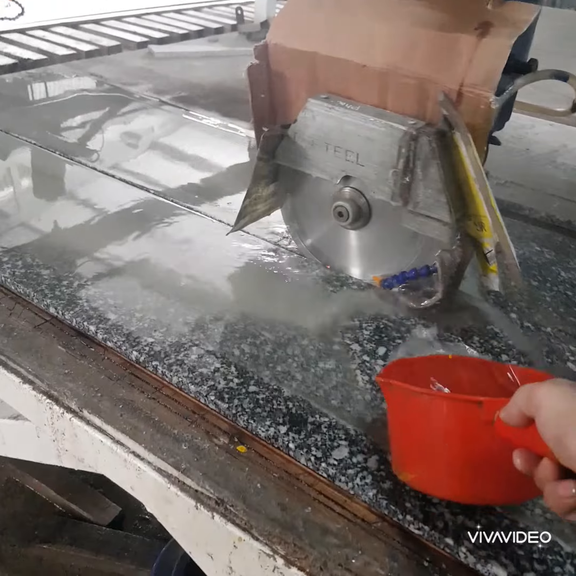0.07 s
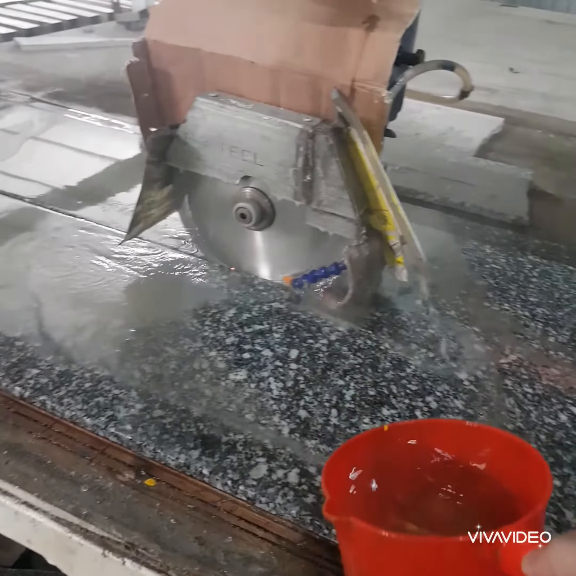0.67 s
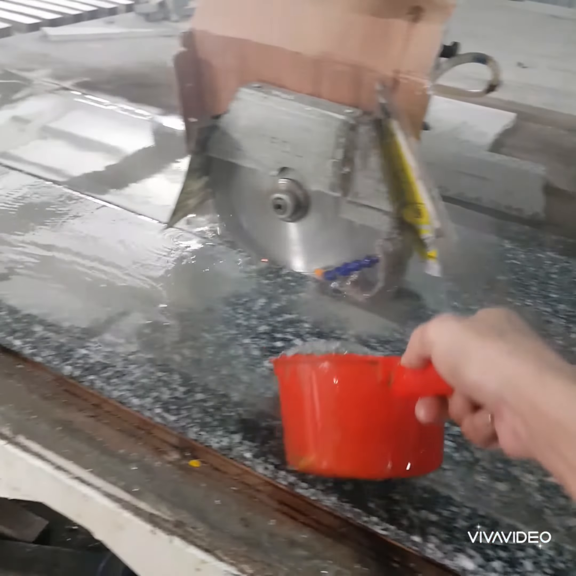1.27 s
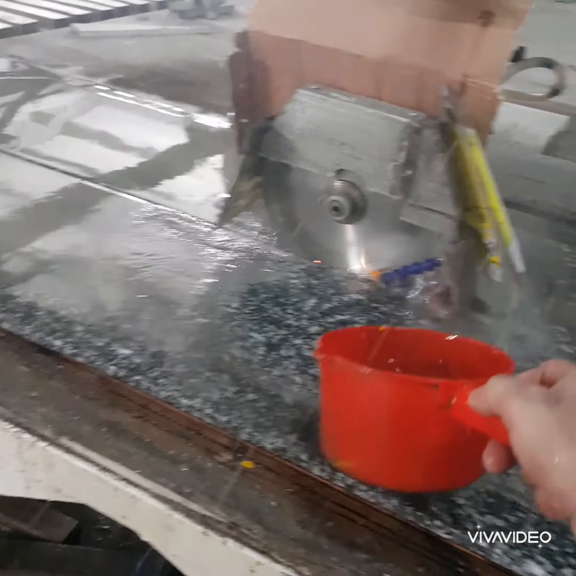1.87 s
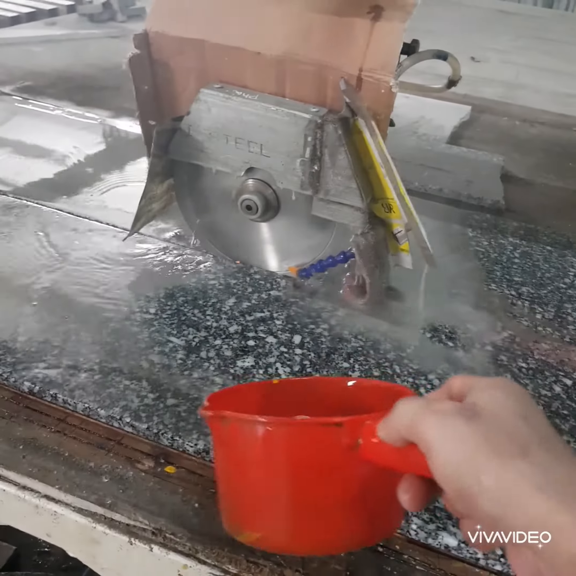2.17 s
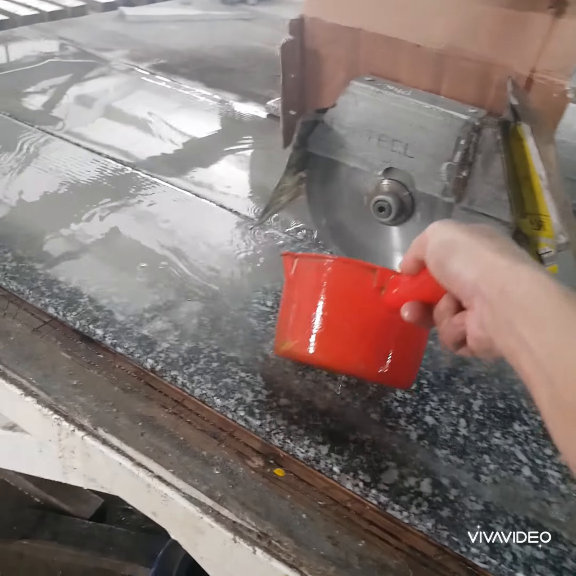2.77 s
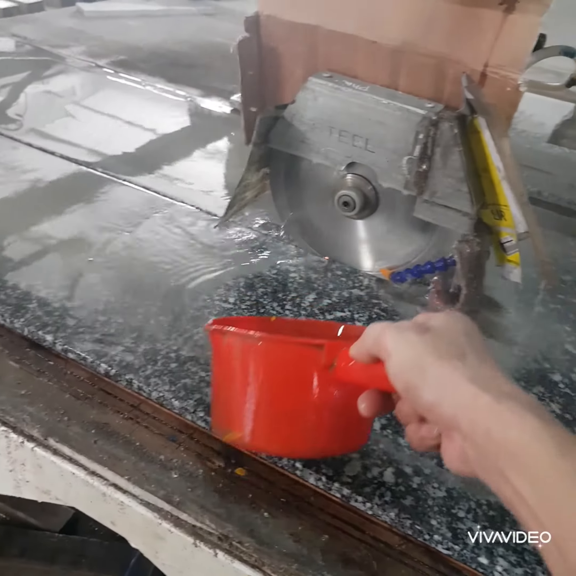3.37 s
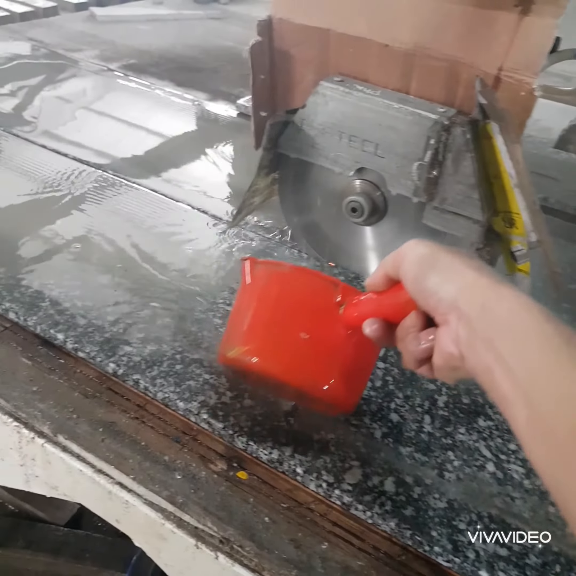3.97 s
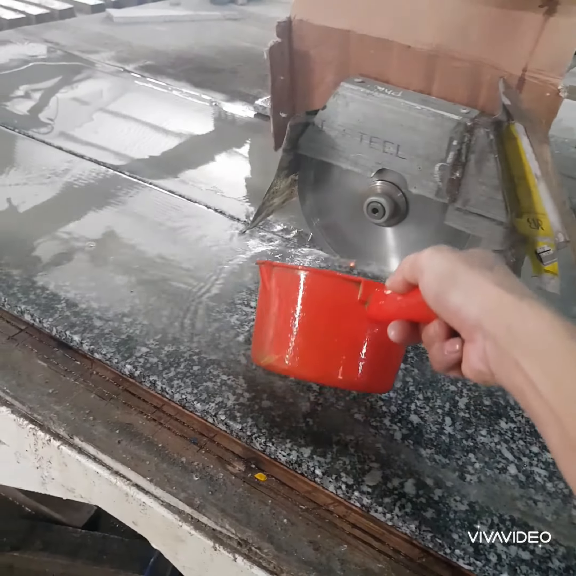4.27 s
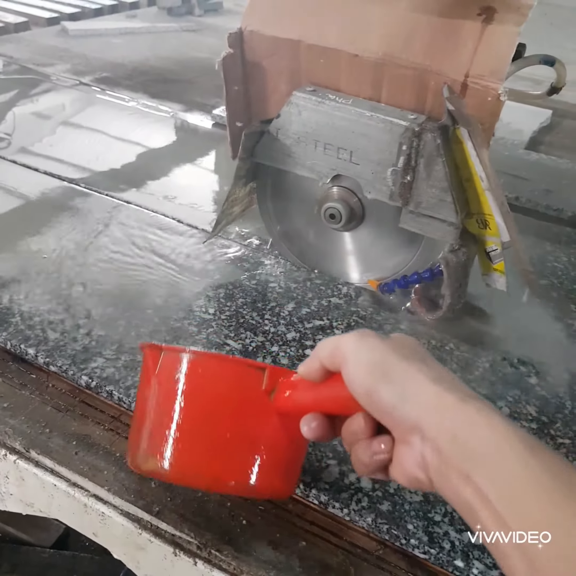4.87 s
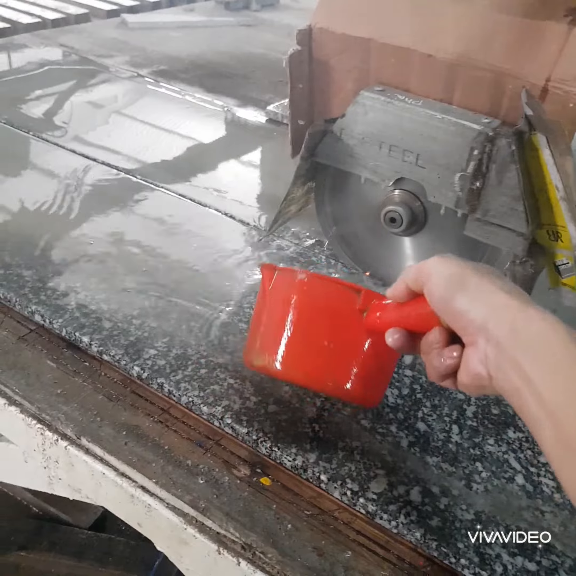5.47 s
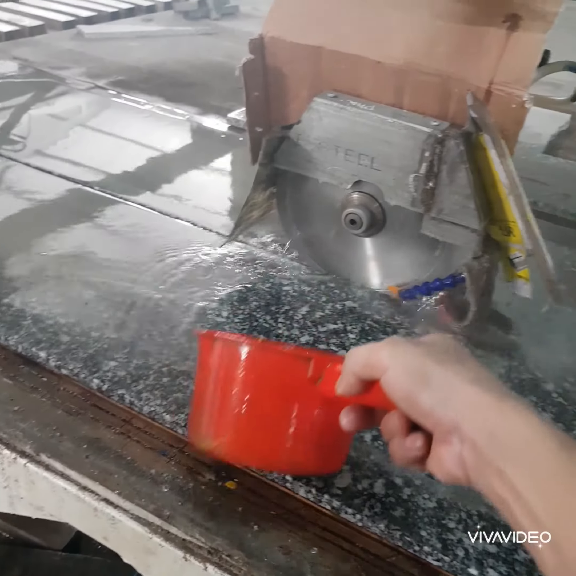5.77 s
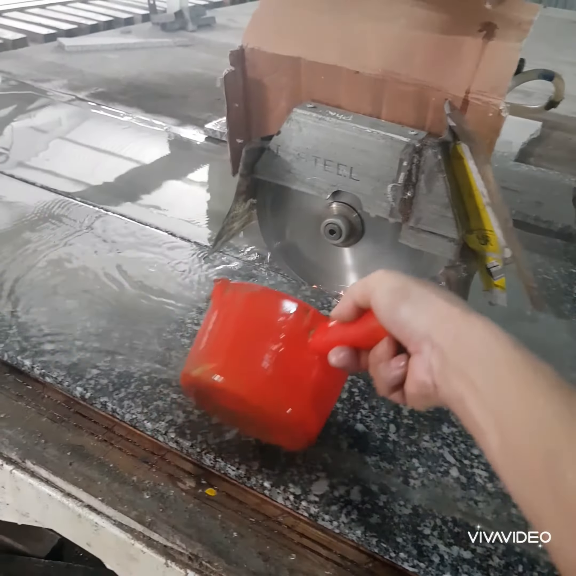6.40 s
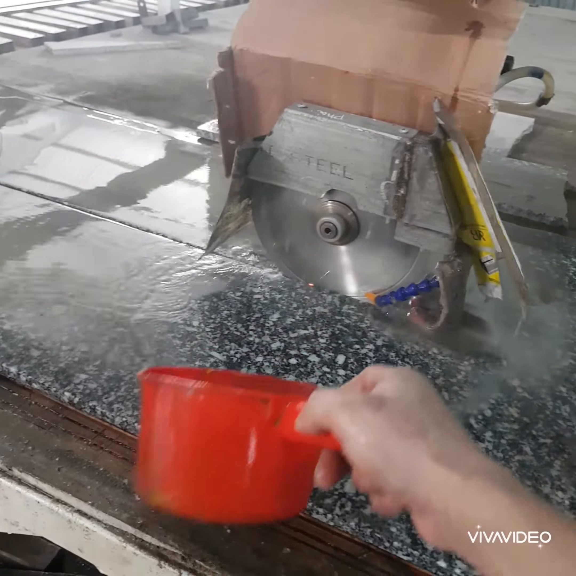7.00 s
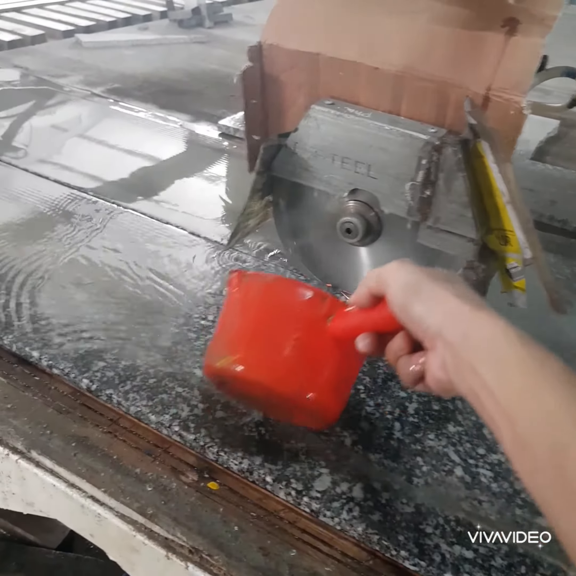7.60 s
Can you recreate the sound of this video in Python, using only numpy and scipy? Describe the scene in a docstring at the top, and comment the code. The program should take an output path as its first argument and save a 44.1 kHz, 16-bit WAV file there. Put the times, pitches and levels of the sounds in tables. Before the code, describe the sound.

Close by in a workshop, a stone saw cuts continuously, droning and whining under a bright hiss of grinding and spray.

```python
"""In a workshop, a bridge saw cuts a wet stone slab close by. Its shaft turns 26-31 times a second and
slows as the cut bites. The blade's 18 uneven segments (its teeth) drum through the frame and howl in
the guard. Diamond grit grinds the stone and sets the steel disc ringing, while cooling water is flung
off as a fizzing spray. Now and then the hiss dips briefly and comes back."""
import sys
import numpy as np
from scipy import signal
from scipy.fft import rfft, irfft, next_fast_len
from scipy.io import wavfile
from scipy.ndimage import uniform_filter1d, map_coordinates

SR = 44100
rng = np.random.default_rng(int(sys.argv[2]) if len(sys.argv) > 2 else 0)


def digitize_waveform(pressure):
    """Quantize a signal to 16-bit integers and store it at the path in sys.argv[1].

    Rows of a 2-D input are taken as channels; values are limited to [-1, 1].
    """
    field = np.atleast_2d(pressure).T
    bounded = np.clip(field, -1, 1)
    quanta = np.round(bounded * 32767).astype(np.int16)
    wavfile.write(sys.argv[1], SR, quanta)


N = 336924
TIME = np.arange(N) / SR

# The shaft slows where the cut bites deeper. Each row: time in seconds, turns per second.
SHAFT_SPEED = [(0.0, 29.08), (0.14, 28.59), (0.44, 25.95), (0.63, 26.07), (0.91, 27.72), (1.16, 28.23),
               (1.49, 29.73), (1.92, 28.89), (2.25, 29.03), (2.74, 27.11), (3.07, 27.99), (3.76, 26.59),
               (4.38, 28.04), (4.69, 29.65), (5.4, 29.99), (6.08, 30.77), (6.41, 29.8), (6.8, 27.95),
               (7.4, 27.85), (7.64, 27.64)]


def amp(db):
    """Turn decibels into a gain."""
    return 10 ** (np.asarray(db) / 20)


def unit(x):
    """Scale x to an average (rms) level of 1."""
    return x / np.sqrt(np.mean(x ** 2) + 1e-20)


def along(points, hz):
    """Read between rows of frequency and value, on a scale of octaves."""
    freqs, values = np.transpose(points)
    return np.interp(np.log(hz + 1), np.log(freqs + 1), values)


def bump(hz, centre, width, db):
    """The lift in dB from one resonance, a pitch at which a part likes to ring."""
    return db / (1 + (2 * (hz - centre) / width) ** 2)


def bumps(hz, modes):
    """The lift in dB from several resonances together."""
    return sum(bump(hz, *mode) for mode in modes)


def bell(middle, length):
    """A smooth swell from 0 to 1 and back; both settings are in seconds."""
    return .5 ** ((2 * (TIME - middle) / length) ** 2)


def curves(rows):
    """One value per sample for each column after the time."""
    times, *columns = np.transpose(rows)
    return [np.interp(TIME, times, column) for column in columns]


def wobble(rate, t=TIME):
    """A smooth random curve that takes rate new values a second."""
    return map_coordinates(rng.standard_normal(4096), [t * rate + 2], mode="mirror")


def jitter(rate, t=TIME):
    """Two wobbles in one complex number, to unsettle both a tone's strength and its timing."""
    return wobble(rate, t) + 1j * wobble(rate, t)


def pan(db):
    """Left and right gains that make the left louder by db and keep the total power."""
    gains = amp(np.array([db, -db]) / 2)
    return gains / np.sqrt(np.mean(gains ** 2, axis=0))


def filtered(x, response):
    """Multiply each frequency in x by response(hz)."""
    size = next_fast_len(N + SR // 4)
    hz = np.fft.rfftfreq(size, 1 / SR)
    return irfft(rfft(x, size) * response(hz), size)[..., :N]


def rush(level_db, pan_db=np.zeros_like, size=4096):
    """Stereo noise at level 1, coloured by level_db(hz, seconds) and placed by pan_db(hz)."""
    # How alike left and right sound. Each row: frequency in Hz, likeness from 0 to 1.
    likeness = [(50, 0.34), (100, 0.23), (170, 0.35), (450, 0.76), (750, 0.26), (1200, 1), (2000, 0.03),
                (3300, 0.3), (5500, 0.067), (15000, 0.064)]
    hz, t, (first, second) = signal.stft(rng.standard_normal((2, N)), SR, nperseg=size)
    hz = hz[:, None]
    spread = np.arccos(np.clip(along(likeness, hz), -1, 1)) / 2
    mid, side = first * np.cos(spread), second * np.sin(spread)
    spectrum = np.array([mid + side, mid - side]) * amp(level_db(hz, t)) * pan(pan_db(hz))
    return unit(signal.istft(spectrum, SR, nperseg=size)[1][:, :N])


def from_left(x, lead_ms):
    """The saw is nearer to the left side, so its sound arrives there first."""
    lead_s = lead_ms / 1000 * np.array([[0.5], [-0.5]])
    return filtered(x, lambda hz: np.exp(2j * np.pi * hz * lead_s))


def reflected(x, echo_db, count=24):
    """Slab, table and walls add weak echoes within 25 ms, which shift as the microphone moves."""
    hop, reach = SR // 5, SR // 40
    echoes = np.zeros((2, N + 4 * hop))
    fade = np.sin(np.pi * np.arange(2 * hop) / (2 * hop))
    padded = np.pad(x, ((0, 0), (hop, 2 * hop)))
    for start in range(0, N + hop, hop):
        taps = np.zeros((2, reach))
        for side in taps:
            strengths = rng.choice([-1, 1], count) / np.sqrt(count)
            side[rng.integers(reach // 10, reach, count)] = strengths
        copies = signal.fftconvolve(padded[:, start:start + 2 * hop] * fade, taps, axes=1)
        echoes[:, start:start + copies.shape[1]] += copies
    return x + amp(echo_db) * echoes[:, hop:hop + N]


def shaft_speed(inertia_s=0.093):
    """Turns per second at each sample; the heavy blade rounds off every change."""
    speed, = curves(SHAFT_SPEED)
    return uniform_filter1d(speed, int(inertia_s * SR), mode="nearest")


def cutting_db():
    """Strength of the cut: it drifts slowly and dips briefly, and some dips end in a surge."""
    # How hard the blade rubs the stone. Each row: time in seconds, level in dB.
    contact = [(0, 0.5), (1.2, 0.4), (1.7, -0.6), (2.3, -0.5), (3.1, -1.5), (3.9, 0.6), (4.3, -1),
               (5.4, -0.73), (6.3, -1.56), (6.9, -2.5), (7.64, -1.5)]
    # Dips in the hiss. Each row: middle and length in seconds, dip in dB, surge after it in dB.
    lulls = [(0.335, 0.19, 3, -0.5), (0.53, 0.059, 3, 3), (1.648, 0.081, 4.5, 0), (1.78, 0.11, 2.5, -0.1),
             (3.084, 0.066, 1, 0.5), (4.356, 0.15, 2.5, 2), (5.7, .14, 2.5, 1.5), (6.767, 0.13, 2, -0.2)]
    level_db, = curves(contact)
    for middle, length, dip_db, surge_db in lulls:
        level_db -= dip_db * bell(middle, length)
        level_db += surge_db * bell(middle + 1.77 * length, 2.5 * length)
    return level_db


def throb(turns, once, twice):
    """A slightly crooked blade presses harder once and twice a turn."""
    return unit(np.exp(once * np.cos(2 * np.pi * turns) + twice * np.sin(4 * np.pi * turns)))


def swell_db(multiple, t=TIME):
    """Lift of the tone at one multiple of the shaft speed, in spells when it sings out or falls back."""
    # Each row: lowest and highest multiple, middle and length in seconds, lift in dB.
    spells = [(17, 19, 0.63, 1.7, -3), (36, 36, .66, 0.11, 4.5), (35, 35, 0.96, 0.48, 10.5),
              (36, 38, 1.28, 0.16, -5), (18, 22, 1.68, .27, 4), (26, 34, 1.71, 0.13, 2.5),
              (22, 23, 2.07, .7, 4), (28, 30, 1.92, .66, 4.5), (36, 36, 2.45, 0.51, 2),
              (5, 5, 2.9, 0.28, 2.5), (37, 37, 3.08, 0.33, 6.5), (36, 36, 3.73, .6, -1.5),
              (38, 41, 3.82, 0.54, 4), (14, 14, 3.97, .55, 4.5), (36, 37, 4.3, 0.24, 5),
              (33, 33, 4.68, .36, 10.5), (35, 35, 4.98, .3, 8.5), (5, 5, 5.85, 1.05, 5.5),
              (32, 34, 5.9, 0.18, 2.5), (37, 37, 7.15, 0.9, 6)]
    return sum(db * .5 ** ((2 * (t - middle) / length) ** 4)
               for low, high, middle, length, db in spells if round(low) <= multiple <= round(high))


def shaft_tones(turns, multiples, colour_db, wander, drift_rate, apart):
    """Tones at multiples of the shaft speed swell in resonances and drift as the contact changes."""
    step = 8  # low tones need only every eighth sample
    t = TIME[::step]
    knots = np.linspace(0, t[-1], 600)  # the times at which loudness is worked out
    speed = np.interp(knots, *np.transpose(SHAFT_SPEED))
    tones = np.zeros((2, len(t)))
    for multiple, db in multiples:
        multiple = round(multiple)
        common = np.exp(2j * np.pi * rng.random()) + wander * jitter(drift_rate, knots)
        room = apart * jitter(drift_rate, knots)  # echoes reach the two sides differently
        level_db = db + colour_db(multiple * speed) + swell_db(multiple, knots)
        gains = amp(level_db) * np.array([common + room, common - room])
        tone = np.exp(2j * np.pi * multiple * turns[::step])
        tones += [(np.interp(t, knots, gain) * tone).real for gain in gains]
    return unit(signal.resample_poly(tones, step, 1, axis=1)[:, :N])


def table_thrum(turns, speed, multiple=5, base_db=-61, waver_db=3.4):
    """The table thrums at five times the shaft speed, most when the load drags the motor down."""
    resonance_db = bump(multiple * speed, centre=135, width=12.5, db=9.4)
    level_db = base_db + resonance_db + swell_db(multiple) + waver_db * wobble(rate=5)
    return amp(level_db) * unit(np.sin(2 * np.pi * multiple * turns)) * pan(1.5)[:, None]


def segment_hum(turns, speed, segments=18, base_db=-51, roughness=0.29):
    """The segments strike the stone in turn: a rough hum that swells as it slides into a resonance."""
    resonance_db = bump(segments * speed, centre=545, width=34, db=15.2)
    level_db = base_db + resonance_db + swell_db(segments)
    blows = 1 + roughness * jitter(rate=40)
    hum = (blows * np.exp(2j * np.pi * segments * turns)).real
    return amp(level_db) * unit(hum) * pan(-3.0)[:, None]


def frame_drone(turns):
    """Unevenly worn segments drum through the frame, over the rumble of motor and table."""
    # The drumming tones. Each row: multiple of the shaft speed, relative level in dB.
    drumming = [(2, -7.5), (3, -7.5), (4, -7.5), (6, -5.5), (7, -5), (8, -4.5), (9, -2), (10, -4), (11, -5),
                (12, -3), (13, -4), (14, -1.5), (15, -2.5), (16, -7), (17, -2), (19, 2), (20, -0.5),
                (21, -1), (22, 3.5), (23, 1), (24, -8), (25, -2), (26, -1), (27, -3)]
    # Resonances of the frame. Each row: pitch in Hz, width in Hz, lift in dB.
    frame_modes = [(167.4, 5.3, 7.5), (259.7, 14, 5.5), (305, 10, 6), (372, 19.6, 8.5), (456, 7.5, 11),
                   (509, 25, 8), (566.4, 22, 10), (659, 5.4, 7), (713, 32, -8), (763, 36, 10.5)]
    # The rumble's colour. Each row: frequency in Hz, relative level in dB.
    rumble_colour = [(20, -29), (40, -31), (58, 2.5), (110, -4.5), (220, -3.5), (380, -0.5), (540, 0),
                     (720, -6), (1200, -39), (2500, -55)]
    # Where the low sounds sit. Each row: frequency in Hz, left over right in dB.
    bass_pan = [(60, 1.5), (250, 2.5), (400, -0.5), (540, -2.5), (670, -17), (800, 14)]
    # How hard frame and table shake. Each row: time in seconds, drone in dB, rumble in dB.
    shaking = [(0, -42, -44.5), (1.1, -43.5, -41.5), (1.7, -38, -49), (2.3, -41.5, -43),
               (3.4, -39.5, -50.5), (3.7, -40, -42.5), (4.4, -38, -43), (5.7, -39, -45.5),
               (6.5, -37.5, -49), (7.1, -41.5, -48.5), (7.64, -43.5, -45)]
    drone_db, rumble_db = curves(shaking)
    drone = shaft_tones(turns, drumming, lambda hz: bumps(hz, frame_modes),
                        wander=0.36, drift_rate=7, apart=0.35)
    drone = filtered(drone, lambda hz: pan(along(bass_pan, hz)))
    rumble = rush(lambda hz, t: along(rumble_colour, hz), lambda hz: along(bass_pan, hz))
    return amp(drone_db) * drone + amp(rumble_db) * rumble * throb(turns, once=0.99, twice=0.19)


def guard_whine(turns, speed, waver_db=1.1, roughness=0.26):
    """Rough tones about an octave above the hum sing out as they slide through the guard's resonances."""
    # The tones. Each row: multiple of the shaft speed, base level in dB.
    strands = [(33, -47), (34, -42), (35, -44.5), (36, -38), (37, -43.5), (38, -45)]
    # Narrow bands that the guard lifts or swallows. Each row: pitch in Hz, width in Hz, lift in dB.
    narrow_modes = [(938, 18, 3.5), (980, 20, 2), (1012, 20, 2.5), (1040, 22, 6), (1130, 45, -6)]
    whine = np.zeros(N)
    for multiple, db in strands:
        multiple = round(multiple)
        level_db = db + bumps(multiple * speed, narrow_modes) + swell_db(multiple)
        level_db += waver_db * wobble(rate=4)
        chop = 1 + roughness * jitter(rate=45)
        tone = np.exp(2j * np.pi * (multiple * turns + rng.random()))
        whine += amp(level_db) * unit((chop * tone).real)
    return whine


def guard_howl(turns, speed, cut_db, follows_cut=0.42, flutter_db=0.6, outer_db=-7, roar_db=-4.5):
    """The blade's slots chop air and water in the guard: a whine, tones around it and a throbbing roar."""
    # The guard's broad colour. Each row: frequency in Hz, relative level in dB.
    guard_colour = [(450, -24), (700, -6), (780, -4.5), (950, 0.5), (1100, 1), (1250, -16.5), (1500, -36),
                    (1900, -27.5), (2600, -50)]
    # Resonances of the guard. Each row: pitch in Hz, width in Hz, lift in dB.
    guard_modes = [(842, 29, 6), (880, 45, 3.5), (990, 30, 7), (1358, 100, 15), (1663, 275, 26.5)]
    # The howl moves towards the middle as the microphone shifts.
    # Each row: time in seconds, base level in dB, left over right in dB.
    howl_path = [(0, -32.5, 9), (1.0, -31, 9), (1.27, -32, 2.5), (1.7, -30, 3), (3.4, -31, 3.5),
                 (4.2, -29.5, 2.5), (4.6, -26.5, 2), (4.95, -31, 1), (5.3, -30.5, 3), (5.9, -30, 2),
                 (6.5, -30, 1), (7.64, -32.5, 2)]
    base_db, side_db = curves(howl_path)
    howl_db = base_db + follows_cut * cut_db + flutter_db * wobble(rate=14)
    colour_db = lambda hz, t=None: along(guard_colour, hz) + bumps(hz, guard_modes)
    around_whine = [(multiple, 0) for multiple in range(28, 60) if not 33 <= multiple <= 38]
    outer_tones = shaft_tones(turns, around_whine, colour_db, wander=0.31, drift_rate=3.156, apart=0.21)
    roar = rush(colour_db) * throb(turns, once=0.19, twice=0.053)
    howl = amp(howl_db) * (amp(outer_db) * outer_tones + amp(roar_db) * roar)
    return from_left((guard_whine(turns, speed) + howl) * pan(side_db), lead_ms=0.16)


def disc_whistle(cut_db, pitch_hz=7730, width_hz=170, rest_db=-41.5, fade_s=0.1, waver_db=2.5):
    """The rubbed disc sings in one narrow, fuzzy band, louder in spells."""
    # Each row: start in seconds, length in seconds, base level in dB.
    spells = [(0.8, 0.85, -32), (1.85, 0.69, -31.5)]
    level_db = rest_db + cut_db + waver_db * wobble(rate=8)
    for start, length, db in spells:
        held = np.clip(np.minimum(TIME - start, start + length - TIME) / fade_s, 0, 1)
        level_db += (db - rest_db) * held
    band_db = lambda hz, t: -20 * np.log10(1 + (2 * (hz - pitch_hz) / width_hz) ** 2)
    return amp(level_db) * rush(band_db)


def disc_ripple_db(hz, t, spacing_hz=42, change_rate=4):
    """The disc's many lesser resonances: each rings for a moment, then its neighbours take over."""
    # Each row: frequency in Hz, depth of the ripple in dB.
    ripple_depth = [(1800, .3), (2800, 1.7), (4500, 2), (6500, 1.7), (9000, 1), (15000, 1)]
    field = rng.standard_normal((1024, 128))
    places = np.broadcast_arrays(hz / spacing_hz, t * change_rate)
    return along(ripple_depth, hz) * map_coordinates(field, places, mode="mirror")


def disc_ring_db(hz, t, flare_db=1.7, stray_hz=7):
    """The steel disc's ringing: the stone's grip makes each resonance flare and stray in pitch."""
    # Resonances and the hollows between them. Each row: pitch and width in Hz, first and last lift in dB.
    disc_modes = [(2670, 170, -2, 1.5), (2960, 67, 8.5, 11), (3110, 140, 5, 5), (3253, 110, 9, 6.5),
                  (3425, 94, -27, 2), (3668, 108, 9, 9), (3820, 130, 2, -4.5), (4087, 155, 6.5, 9),
                  (4285, 70, -8, -9), (4390, 84, 5, 10), (4780, 81, 9, 9.5), (5050, 190, 1.5, 6),
                  (5200, 110, 0, -2.5), (5590, 140, 7.5, 9), (6040, 130, 1.5, 1), (6310, 100, 2, 7),
                  (6370, 90, -2, -3), (6730, 100, 6.5, 8), (7150, 170, 4.5, 8.5), (7520, 200, 3, 2.5),
                  (7710, 150, 11.5, 7), (8290, 77, 0, 15.5), (8480, 90, 11, 10), (8810, 55, 3, 6),
                  (8900, 106, 5, 8.5), (9150, 90, 4.5, 7), (9510, 88, 1.5, 4.5), (9600, 180, 1.5, 6),
                  (11230, 200, -0.5, 1), (11750, 160, 1, 2), (12850, 250, 2, 2), (13260, 150, 2, 6),
                  (15350, 120, 7.5, 11)]
    total_db = disc_ripple_db(hz, t)
    for centre, width, first_db, last_db in disc_modes:
        lift_db = first_db + (last_db - first_db) * t / t[-1] + flare_db * wobble(20, t)
        total_db += bump(hz, centre + stray_hz * wobble(5, t), width, lift_db)
    return total_db


def chipping(flutter_db=0.77, grain_db=0.34):
    """Stone and water break off unevenly, so the loudness flickers."""
    return amp(flutter_db * wobble(rate=70) - grain_db * wobble(rate=480))


def grit_and_spray(turns, cut_db, grit_db=-21.5, spray_db=-19, split_hz=8100, pivot_hz=11000):
    """Grit scrapes the stone and rings the disc; water spray takes over in the top octave."""
    # The scrape's broad colour. Each row: frequency in Hz, relative level in dB.
    scrape_colour = [(700, -25.5), (1500, -15), (2300, -14), (2800, -5.5), (3450, -9), (4500, -8.5),
                     (6000, -3.5), (7900, -9), (9000, -4), (11500, 1), (12300, -6.5), (13200, -3),
                     (14500, -6.5), (15500, -9)]
    # Finer drops sound brighter. Each row: time in seconds, slope in dB per octave.
    spray_tilt = [(0, 2.5), (1.2, 2.5), (1.7, 0.5), (2.4, 1), (3.2, 0.5), (4.6, -0.5), (6, 0), (6.8, 1.5),
                  (7.64, 1.5)]
    # Where the high sounds sit. Each row: frequency in Hz, left over right in dB.
    treble_pan = [(1700, 5), (2900, 0), (4200, 1.5), (4800, 3), (5400, 1.5), (6600, -1), (7900, -0.5),
                  (8400, 3), (8850, 14), (9700, 9.5), (11500, 5), (12900, 15), (13500, 3), (15000, 7)]

    def colour_db(hz, t):
        octaves = np.log2(np.maximum(hz, split_hz) / pivot_hz)
        tilt_db = np.interp(t, *np.transpose(spray_tilt)) * octaves
        return along(scrape_colour, hz) + disc_ring_db(hz, t) + tilt_db

    scrape = rush(colour_db, lambda hz: along(treble_pan, hz), size=2048)
    scrape = from_left(reflected(scrape, echo_db=-8.0), lead_ms=0.12)
    lower = filtered(scrape, lambda hz: 1 / (1 + (hz / split_hz) ** 20))
    grit = unit(lower * chipping() * throb(turns, once=0.069, twice=0.018))
    spray = unit((scrape - lower) * chipping() * throb(turns, once=0.084, twice=0.084))
    # The spray follows the cut more strongly than the grit does.
    return amp(grit_db + cut_db) * grit + amp(spray_db + 1.19 * cut_db) * spray


def scene():
    """The speed of one shaft and the strength of its cut drive the whole saw."""
    speed, cut_db = shaft_speed(), cutting_db()
    turns = np.cumsum(speed) / SR
    body = frame_drone(turns) + table_thrum(turns, speed) + segment_hum(turns, speed)
    return body + guard_howl(turns, speed, cut_db) + grit_and_spray(turns, cut_db) + disc_whistle(cut_db)


def record(dry, top_hz=15520):
    """The microphone's opening swallows one treble band, and nothing above top_hz is kept."""
    # The one row: frequency in Hz, width in Hz, change in dB.
    notch = [(8170, 290, -8)]
    return filtered(dry, lambda hz: amp(bumps(hz, notch)) * (hz < top_hz))


dry = scene()
out = record(dry)
digitize_waveform(out)
```